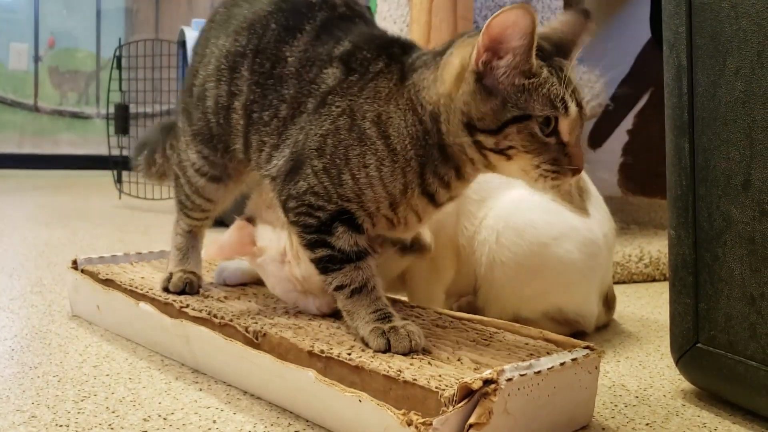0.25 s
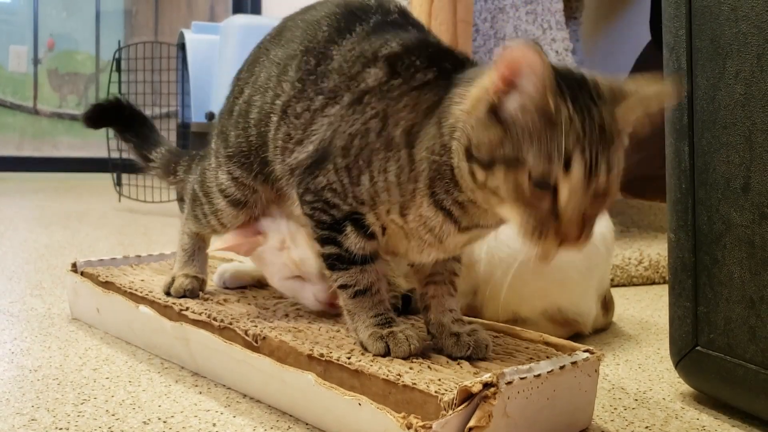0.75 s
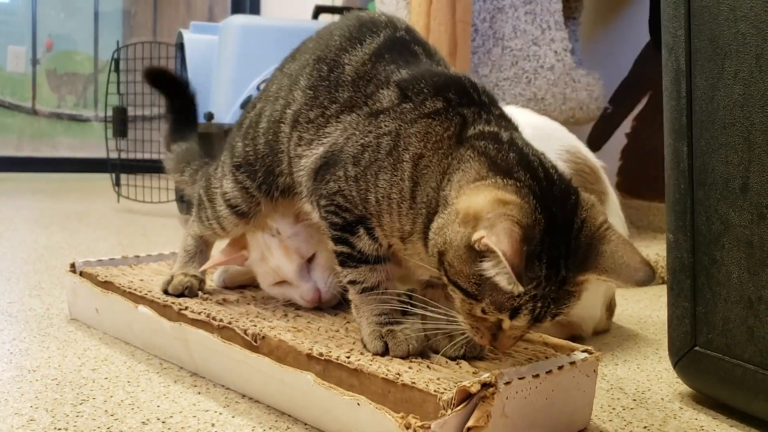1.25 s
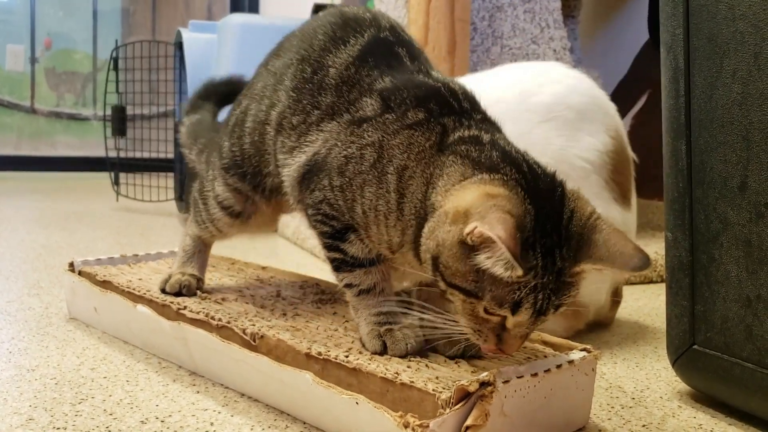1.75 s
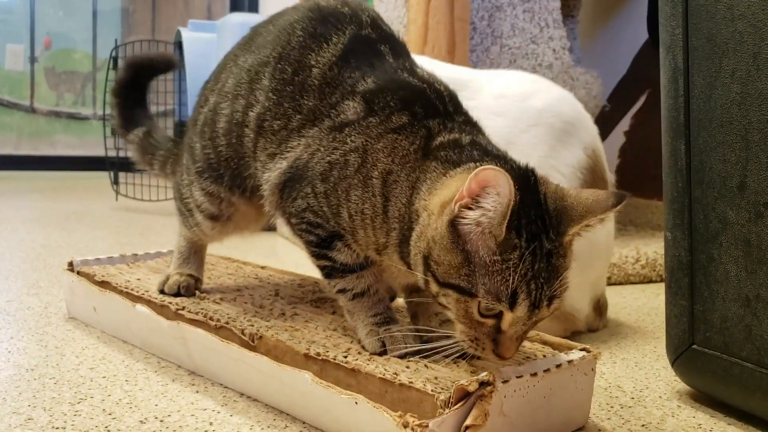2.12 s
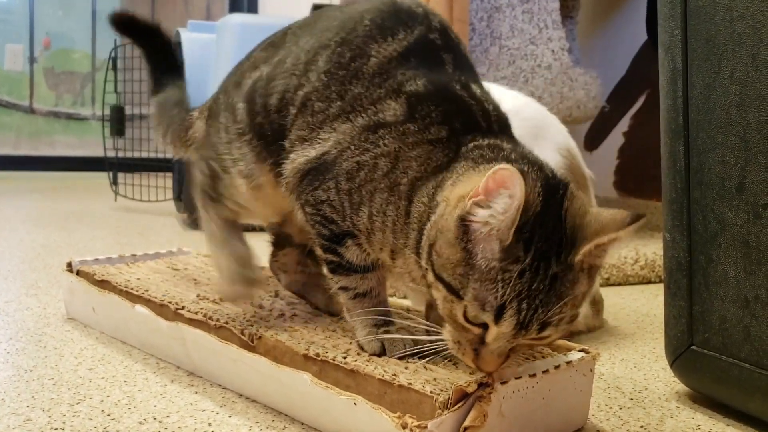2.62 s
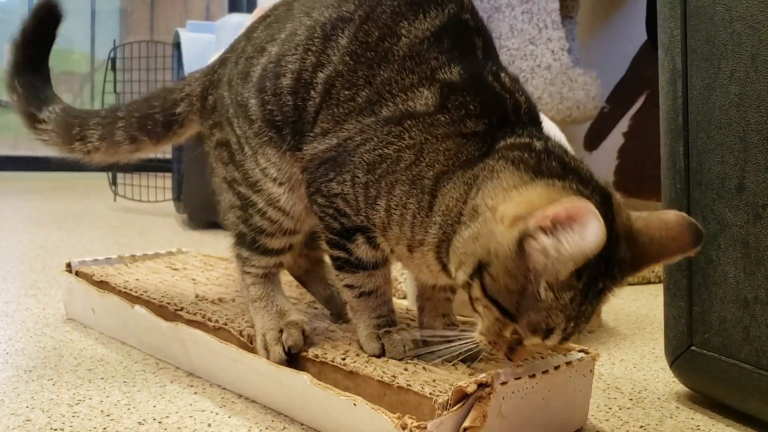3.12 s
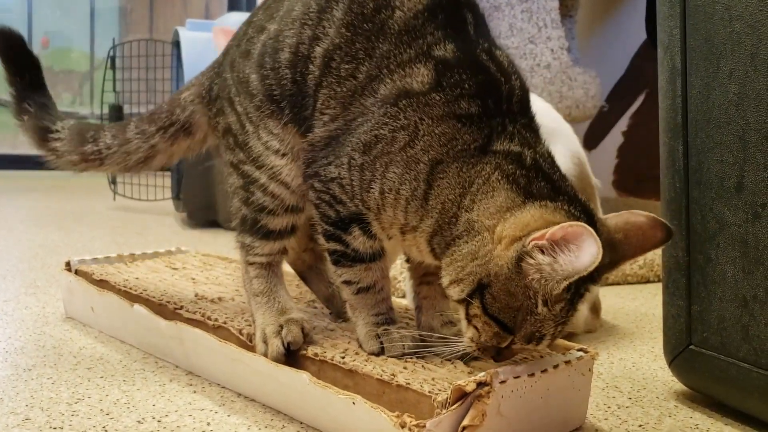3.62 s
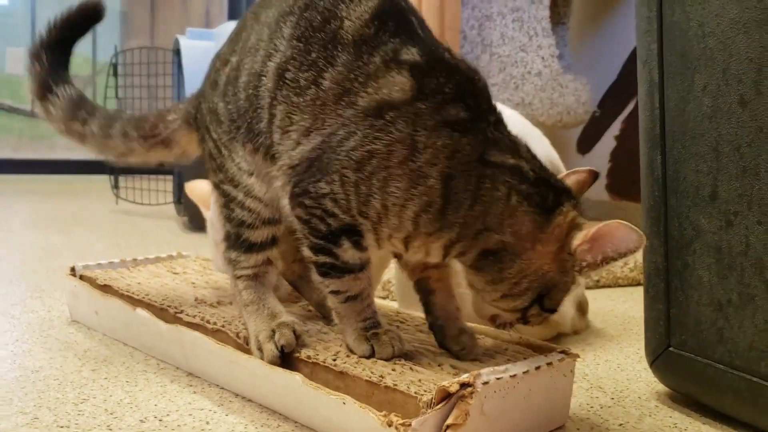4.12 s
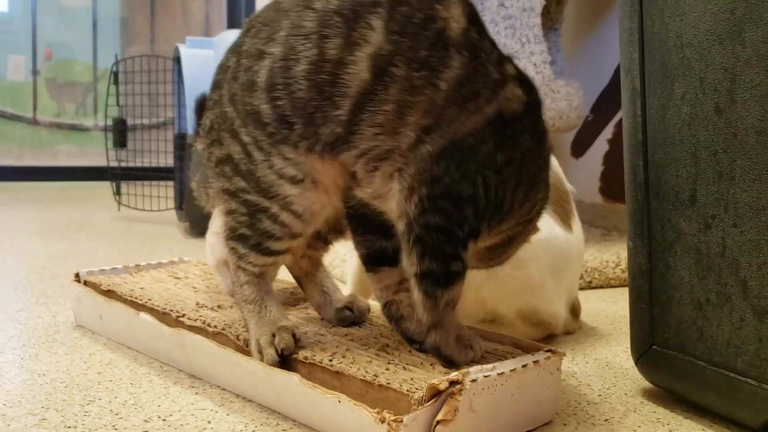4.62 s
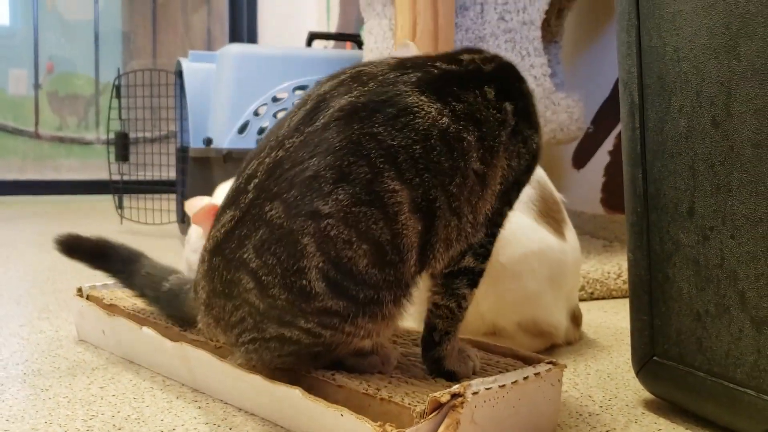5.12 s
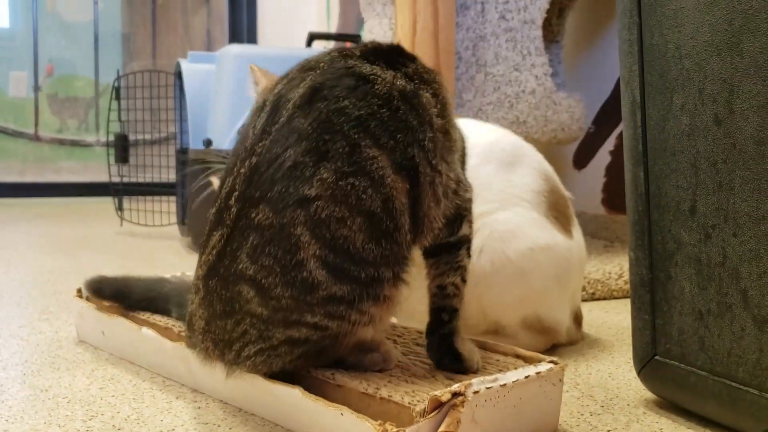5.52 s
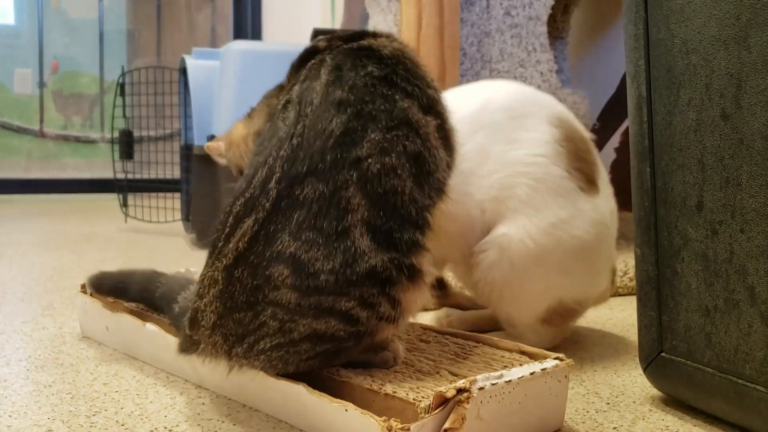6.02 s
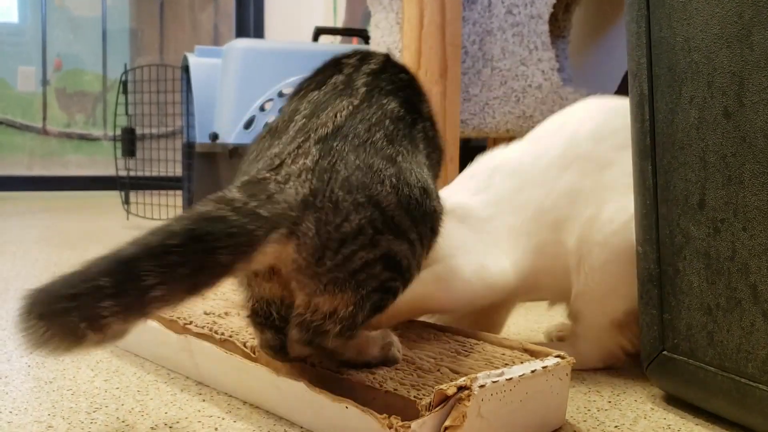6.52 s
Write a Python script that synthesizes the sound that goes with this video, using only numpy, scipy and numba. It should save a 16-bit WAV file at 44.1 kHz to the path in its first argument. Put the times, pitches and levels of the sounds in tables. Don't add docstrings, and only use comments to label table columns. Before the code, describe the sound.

Close stereo phone pickup in a quiet hard-floored room. A cat on a corrugated cardboard scratcher makes small pad rasps, papery rustles and tiny claw ticks. Around four seconds it turns, fur brushing toward the left, ending in a sharp cluster of claw snaps and hollow knocks. A quieter lull follows, then another scrabble as it steps off. Low ventilation rumble, faint hiss and a distant once-a-second clock continue underneath.

```python
import sys
import numpy as np
from scipy import signal
from scipy.fft import rfft, irfft
from scipy.io import wavfile
from scipy.ndimage import uniform_filter1d
from numba import njit

SR = 44100
rng = np.random.default_rng(int(sys.argv[2]) if len(sys.argv) > 2 else 0)


def transcribe(signal):
    frames = np.atleast_2d(signal).T
    limited = np.clip(frames, -1, 1)
    pcm = np.round(limited * 32767).astype(np.int16)
    wavfile.write(sys.argv[1], SR, pcm)


def boost(x):
    u = np.asarray(x, float) / 20
    return 10 ** u


N = 298116
TIME_S = np.arange(N) / SR
BIN_HZ = np.fft.rfftfreq(N, 1 / SR)

# [f/Hz, width/Hz, level/dB]
BOX_MODES = [(413, 150, 14), (467.7, 75, 7), (620, 148, -5), (1050, 274, 1.5)]


def gains(points):
    hz, db = np.transpose(points)
    return boost(np.interp(np.log(BIN_HZ + 1), np.log(hz), db))


def colour(x, points):
    y = irfft(rfft(x) * gains(points), N)
    return y / np.sqrt(np.mean(y ** 2))


@njit
def svf(x, hz, q):
    y, b, l = np.empty(len(x)), 0., 0.
    for i in range(len(x)):
        g = np.tan(np.pi * hz[i] / SR)
        v = (b + g * (x[i] - l)) / (1 + g * (g + 1 / q))
        b, l, y[i] = 2 * v - b, l + 2 * g * v, v / q
    return y


def ring(x, hz, width):
    return signal.lfilter(*signal.iirpeak(hz, hz / width, SR), x)


def double_ring(x, hz, first_width, second_width):
    return ring(ring(x, hz, first_width), hz, second_width)


def walk(rate_hz):
    k = int(SR / rate_hz)
    held = np.repeat(rng.standard_normal(N // k + 1), k)
    smooth = uniform_filter1d(uniform_filter1d(held, k), k)[:N]
    return smooth / smooth.std()


def slips(per_s, spread_db, patchy_db):
    when, size = rng.random((2, N))
    force = (when < per_s / SR) * boost(-spread_db * np.log(size) + patchy_db * walk(60))
    x = force * np.sign(rng.standard_normal((2, N)))
    return x / np.sqrt(np.mean(x ** 2))


def effort_db(touches, rest_db):
    ms = np.arange(0, 1000 * N / SR + 1)
    columns = list(zip(*touches))[:4]
    s, rise_ms, fall_ms, db = (np.array(c)[:, None] for c in columns)
    late_ms = ms - 1000 * s
    touch_db = db - 20 * np.maximum(-late_ms / rise_ms, late_ms / fall_ms)
    power = boost(2 * rest_db) + boost(2 * touch_db).sum(axis=0)
    return np.interp(1000 * TIME_S, ms, 10 * np.log10(power))


def rub(x, touches, rest_db):
    limit_db = -52
    return boost(np.minimum(effort_db(touches, rest_db), limit_db)) * x


def ventilation():
    # [f/Hz, level/dB per Hz]
    rumble_spectrum = [(12, -38), (26, -28.5), (40, -1.5), (81, 7), (123, -4.5), (161, -4), (192, -18.5),
                       (204, -13.5), (226, -16), (270, -19.5), (287, -21), (364, -26.5), (398, -23.5),
                       (483, -100), (700, -93), (910, -118), (1540, -120)]
    # [t/s, level/dB]
    rumble_level = [(0, -46.5), (1.5, -48), (3.196, -48), (3.8, -47), (6.76, -46)]
    # [f/Hz, side minus mid/dB]
    rumble_side = [(30, -19), (100, -27), (160, -11), (280, -22.5), (600, 16.5)]
    # [f/Hz, width/Hz, level/dB rms]
    duct_modes = [(57.5, 2.7, -58), (82.6, 7.1, -65), (166.44, 4.9, -64)]
    # [f/Hz, level/dB rms]
    motor_tones = [(221, -59.5), (240, -74), (259, -64.5)]
    mid, other = colour(rng.standard_normal((2, N)), rumble_spectrum + [(1100, -72.5)])
    mid = np.roll(mid, -np.argmin(mid[:SR // 4]))
    side = irfft(rfft(other) * gains(rumble_side), N)
    air_gain = boost(np.interp(TIME_S, *np.transpose(rumble_level)))
    out = air_gain * (mid + side * np.array([[1], [-1]]))
    for hz, width_hz, db in duct_modes:
        boom = double_ring(rng.standard_normal(N), hz, 2 * width_hz, width_hz)
        out = out + boost(db) * boom / boom.std()
    wander_hz = 1.7
    for hz, db in motor_tones:
        swell = np.sqrt(2) * boost(db + 2.2 * walk(4.6))
        turns = np.cumsum(hz + wander_hz * walk(15)) / SR
        out = out + swell * np.sin(2 * np.pi * turns)
    return out


def hiss():
    # [f/Hz, level/dB per Hz]
    hiss_spectrum = [(450, -25), (700, 1), (1000, -1), (1600, -5), (2150, 3.5), (2600, -2), (3100, -2),
                     (4000, -3.5), (5200, -10), (6300, -7.5), (7700, -3), (8200, -13), (10000, -9),
                     (13000, -4), (15700, -5)]
    return boost(-83 + .6 * walk(4)) * colour(rng.standard_normal((2, N)), hiss_spectrum)


def floor():
    # [peak t/s, rise/ms, fall/ms, level/dB]
    sways = [
        (2.6, 440, 690, -51),
        (4.2, 710, 540, -64),
        (5.7, 480, 500, -51),
        (6.2, 370, 440, -52),
        (6.6, 400, 1100, -51),
    ]
    sway = double_ring(rng.standard_normal(N), 48, 40, 35)
    return boost(effort_db(sways, -82)) * sway / sway.std()


def clock():
    # [t/s, length/s, whirr level/dB, case level/dB]
    clock_steps = [
        (0.406, 0.1, -72, -73.5),
        (1.4, 0.12, -77, -72.5),
        (2.4, 0.12, -75.5, -78),
        (3.402, 0.13, -76.5, -74),
        (4.387, 0.15, -87, -72),
        (5.372, 0.19, -77, -72.5),
        (6.405, 0.063, -70, -69),
    ]
    gear = slips(3000, 1.8, 1.8)
    whirr = double_ring(gear, 5100, 800, 550) + boost(-6) * double_ring(gear, 6500, 900, 900)
    case = ring(ring(gear, 1940, 780), 1720, 350)
    out = 0
    for s, length_s, whirr_db, case_db in clock_steps:
        u = (TIME_S - s) / length_s
        swell = np.clip(u / 0.16, 0, 1) * np.clip((1.3 - u) / 0.93, 0, 1)
        out = out + swell * (boost(whirr_db) * whirr / whirr.std() + boost(case_db) * case / case.std())
    return out


def pads():
    # [peak t/s, rise/ms, fall/ms,
    # level/dB, flute f/Hz]
    pad_touches = [(.45, 100, 160, -64.5, 1420), (.92, 97, 250, -68, 1050), (1.04, 160, 75, -70.5, 1270),
                   (1.44, 100, 130, -73, 1750), (1.55, 40, 110, -69.5, 1820), (1.585, 93, 230, -68, 1240),
                   (2.16, 94, 120, -65.5, 1250), (2.44, 200, 160, -78, 1930), (2.585, 21, 115, -63.5, 1630),
                   (2.87, 120, 63, -69, 1050), (3.06, 380, 160, -86.5, 2110), (3.45, 160, 110, -72, 1520),
                   (3.74, 73, 88, -74.5, 1400), (5.44, 125, 180, -67, 1400), (5.735, 70, 99, -69, 1600),
                   (5.99, 73, 90, -63, 1700), (6.07, 120, 130, -68, 1050),
                   (4.07, 100, 200, -72, 2180), (4.12, 45, 250, -65.5, 1330), (4.2, 72, 100, -58.5, 1140),
                  (4.26, 60, 60, -75, 1030), (4.44, 100, 220, -69, 1800), (4.589, 190, 150, -67.5, 2100),
                  (4.715, 13, 200, -59, 1770), (4.76, 59, 41, -60, 1780), (4.808, 8, 44.6, -56, 1890),
                  (4.836, 14.2, 115, -50.5, 3120), (4.9, 100, 62, -56.5, 2870), (6.295, 14, 210, -65, 1040),
                  (6.445, 35, 61, -55, 1420), (6.5, 110, 69, -54, 1670), (6.615, 40, 84, -66, 1640),
                  (6.632, 180, 46, -58, 1740), (6.665, 60, 40, -71, 1620), (6.69, 16, 32, -50, 1260),
                  (6.75, 150, 200, -55.5, 1320)]
    touches = sorted(pad_touches)
    flute_hz = np.interp(TIME_S, [p[0] for p in touches], [p[-1] for p in touches])
    scrape_hz = 0.7 * flute_hz
    grit = slips(2500, 1.1, 1.7)
    flute = np.array([svf(svf(x, flute_hz, 1.8), flute_hz, 2.8) for x in grit])
    scrape = np.array([svf(svf(x, scrape_hz, 0.69), scrape_hz, 0.69) for x in grit])
    rasp = flute + 0.9 * scrape
    return rub(rasp / rasp.std(), touches, -86)


def fibres():
    # [f/Hz, level/dB per Hz]
    fibre_spectrum = [(2820, -74), (4800, -18), (7360, 3.5), (8590, -6.5), (10200, -0.5), (13100, 0),
                      (15000, 1.5), (15800, -4)]
    # [peak t/s, rise/ms, fall/ms, level/dB]
    rustles = [(.45, 240, 170, -64.5), (.95, 50, 330, -68.5), (1.04, 190, 58, -63.5), (1.44, 230, 150, -71),
               (1.57, 93, 960, -70), (1.72, 460, 970, -75), (2.16, 230, 160, -66), (2.44, 78, 460, -74),
               (2.584, 25, 66, -53.5), (2.78, 120, 200, -71), (2.87, 230, 83, -68.5), (3.45, 110, 70, -71),
               (5.03, 100, 250, -76), (5.37, 400, 460, -69), (5.74, 140, 140, -70), (5.99, 130, 210, -63)]
    # [peak t/s, rise/ms, fall/ms, level/dB]
    sweeps = [(3.88, 97, 500, -66), (3.99, 170, 830, -58.5), (4.17, 310, 370, -67), (4.43, 240, 540, -61.5),
              (4.6, 330, 130, -62.5), (4.71, 32, 210, -56.5), (4.79, 100, 100, -68), (4.83, 84, 23, -51),
              (4.9, 170, 130, -57), (6.3, 84, 270, -63), (6.45, 130, 93, -58), (6.5, 110, 140, -56),
              (6.64, 160, 59, -63), (6.683, 11, 20, -54), (6.76, 270, 100, -57.5)]
    fibre = colour(slips(12000, 0.4, 1.37), fibre_spectrum)
    finest = irfft(rfft(fibre) * (BIN_HZ > 11500), N)
    quieter_rustles = [(s, rise, fall, db - 4.5) for s, rise, fall, db in rustles]
    coarse = rub(fibre - finest, rustles + sweeps, -85)
    return coarse + rub(finest, quieter_rustles + list(sweeps), -81)


def leaning():
    # [peak t/s, rise/ms, fall/ms, level/dB]
    leans = [(.46, 120, 225, -63.5), (.94, 144, 140, -66), (1.46, 240, 720, -69.5), (2.54, 510, 130, -75),
             (3.5, 260, 180, -71), (4.1, 25, 170, -63.5), (4.19, 460, 61, -74), (4.45, 34, 580, -73.5),
             (4.76, 72, 100, -75), (4.787, 31, 170, -48), (4.83, 66, 80, -54), (5.44, 1800, 710, -76.5),
             (5.83, 260, 480, -70.5), (5.98, 35, 110, -57.5), (6.07, 100, 270, -78), (6.31, 63, 160, -61.5),
             (6.46, 52, 210, -55), (6.5, 140, 55, -57), (6.62, 220, 330, -58), (6.71, 66, 900, -54)]
    creak = slips(900, 1.7, 1.6)
    creak = creak + 0.32 * creak[::-1]
    hollow = sum(boost(db) * double_ring(creak, hz, 2 * w, w) for hz, w, db in BOX_MODES)
    return rub(hollow / hollow.std(), leans, -81)


def fur():
    # [f/Hz, level/dB per Hz]
    fur_spectrum = [(1300, -30), (2050, -7), (2700, -5), (3150, 4), (4700, 1.5), (6000, 1), (7000, -1.5),
                    (9000, -46)]
    # [peak t/s, rise/ms, fall/ms, level/dB]
    drags = [(.54, 200, 430, -84.5), (.92, 89, 100, -76.5), (1.03, 570, 630, -78.5),
             (1.57, 290, 1400, -81.5), (2.16, 100, 120, -73.5), (2.59, 28, 85, -66), (2.85, 970, 280, -82),
             (3.45, 200, 290, -84), (3.99, 73, 550, -60.5), (4.12, 440, 370, -63), (4.45, 130, 660, -67),
             (4.6, 500, 350, -64.5), (4.72, 33, 290, -60.5), (4.818, 22, 27, -56), (4.84, 30, 200, -63),
             (4.91, 52, 62, -71), (5.37, 460, 540, -77.5), (5.74, 150, 180, -81), (5.98, 260, 330, -76.5),
             (6.31, 100, 610, -73), (6.5, 165, 140, -61), (6.72, 120, 900, -66.5)]
    # [t/s, left minus right/dB]
    turn_left = [
        (3.7, 0),
        (3.95, 15),
        (4.2, 12),
        (4.6, 8),
        (4.75, 1),
    ]
    brush = colour(slips(9000, 0.47, 0.78), fur_spectrum)
    left = boost(np.interp(TIME_S, *np.transpose(turn_left)) / 2)
    brush = brush * np.array([left, 1 / left]) * 2 / (left + 1 / left)
    return rub(brush, drags, -91)


def claws():
    # [t/s, peak level/dB, ring f/Hz, tick level/dB]
    catches = [(0.8874, -64, 950, -61), (0.946, -59, 890, -47.5), (1.5366, -64, 920, -71),
               (1.636, -68, 1030, -54), (1.669, -58, 4100, -55), (2.137, -64, 958, -51),
               (2.152, -53, 1260, -46.5), (2.157, -58, 1300, -58), (2.2, -59, 1430, -70),
               (2.228, -71, 1100, -60), (1.993, -86, 1200, -55), (2.1945, -54, 1400, -68),
               (2.2335, -72, 1060, -55), (2.574, -61, 1110, -52), (2.5835, -65, 950, -62),
               (2.6624, -64, 1540, -59), (2.8544, -61, 1050, -70), (3.194, -84, 956, -62),
               (3.4705, -62, 1070, -56.5), (3.637, -89, 910, -66), (4.098, -59, 870, -64),
               (4.1384, -57, 1610, -60), (4.5694, -57, 2320, -61), (1.55, -61, 1680, -78),
               (4.15, -51, 1580, -70), (4.207, -59, 1050, -70), (4.217, -58, 1000, -70),
               (5.938, -54, 530, -72), (4.195, -50, 960, -70), (5.838, -57, 450, -75),
               (6.287, -69, 872, -66), (6.307, -65, 1090, -71)]
    # [t/s, peak level/dB, ring f/Hz, tick level/dB, tear length/ms]
    snaps = [(4.193, -41, 1930, -44, 0.38), (4.7177, -46, 1650, -43, 1.9), (4.7073, -57, 1600, -46, 1.3),
             (4.7103, -57, 1700, -52, 1.1), (4.743, -48, 1750, -58, 2.1), (4.7524, -39, 1940, -43, 1.6),
             (4.7833, -31.5, 1770, -25, 1.36), (4.8035, -32.5, 1760, -29.5, 0.8),
             (4.8152, -24.5, 3000, -41, 0.63), (4.816, -35, 3740, -36, 0.7), (4.805, -35, 1170, -28, 1.3),
             (4.8095, -37.5, 1820, -34, 2), (4.816, -35, 1870, -29, 1.4), (4.785, -36.5, 1110, -44, 1.6),
             (4.829, -45.5, 2900, -51, 1.3), (4.832, -36, 1900, -49, 0.89), (4.8506, -44, 2800, -59, 1.04),
             (4.909, -51, 2400, -44.5, 5.1), (6.407, -59, 1960, -65, 1.1), (6.423, -50, 1690, -65, 1.2),
             (6.437, -50, 1080, -57, 0.84), (6.442, -48.5, 1900, -62, 1.7), (6.495, -50, 1690, -38, 3.2),
             (6.502, -46, 3300, -39, 1.3), (6.611, -47, 1830, -63, 0.9), (6.629, -33.5, 1840, -54, 1.6),
             (6.636, -43.5, 1800, -50, 1.5), (6.68, -60, 1500, -44, 1.5), (6.6835, -35, 1400, -35, 0.34),
             (6.7034, -55, 977, -63, 1.1), (6.7197, -42, 860, -59, 1.4), (6.7565, -55, 1535, -40.5, 2.5)]
    # [f/Hz, width/Hz, level/dB]
    tick_modes = [(4250, 1040, 0.5), (7530, 1700, 4), (10830, 3300, -1.5), (14200, 4000, 0)]
    port_lag = 3
    out, t = np.zeros((2, N + 4096)), np.arange(4096) / SR
    rows = [tuple(row) + (1.24, 6000) for row in catches] + [tuple(row) + (3000,) for row in snaps]
    for s, ring_db, hz, tick_db, tear_ms, edge_hz in rows:
        burst = np.sqrt(t) * np.exp(-t / np.clip(tear_ms / 1000, .0002, .005))
        shared, left, right = rng.standard_normal((3, 4096)) * burst
        tear = np.array([1.54 * shared + 1.3 * left, np.roll(0.38 * shared + 1.16 * right, port_lag)])
        high_pass = signal.butter(2, edge_hz, "highpass", fs=SR, output="sos")
        bright = signal.sosfilt(high_pass, tear)
        tear[[0, 1], [24, 24]] += 1.1 * np.sqrt(np.sum(tear ** 2, axis=1))
        flute = double_ring(tear, hz, .55 * hz, .2 * hz)
        flute = flute + 0.3 * double_ring(tear, 0.61 * hz, 0.36 * hz, 0.36 * hz)
        tick = sum(boost(db) * ring(bright, f, w) for f, w, db in tick_modes)
        at = int(s * SR)
        out[:, at:at + 4096] += boost(ring_db) * flute / np.abs(flute).max()
        out[:, at:at + 4096] += boost(tick_db) * tick / np.abs(tick).max()
    return out[:, :N]


def paws():
    # [t/s, peak level/dB]
    knocks = [(0.8886, -69), (1.536, -64), (2.662, -74), (3.472, -70), (4.718, -59), (4.7547, -49),
              (4.8087, -38.5), (4.815, -39.5), (4.8264, -66), (4.8337, -46), (4.8494, -52.5), (5.842, -74),
              (5.94, -60), (6.439, -69), (6.495, -50), (6.6281, -54), (6.6843, -38), (6.702, -48),
              (6.719, -50)]
    out, t = np.zeros(N + 4096), np.arange(4096) / SR
    soft_start = 1 - np.exp(-t / 0.0035)
    knock = 0
    for hz, width_hz, db in BOX_MODES:
        decay = np.exp(-np.pi * .9 * width_hz * t)
        knock = knock + boost(db) * np.sin(2 * np.pi * hz * t) * decay * soft_start
    for s, db in knocks:
        at = int(s * SR)
        out[at:at + 4096] += boost(db) * knock / np.abs(knock).max()
    return out[:N]


def room(x):
    t60_s, tail_db, scatter_s = 0.22, -15, 0.008
    t = np.arange(SR // 2) / SR
    swell = np.exp(-np.log(1000) * t / t60_s) * (1 - np.exp(-t / scatter_s))
    tail = rng.standard_normal((2, len(t))) * swell
    tail = tail * boost(tail_db) / np.sqrt(np.sum(tail ** 2, axis=1, keepdims=True))
    return x + signal.fftconvolve(x, tail, axes=1)[:, :N]


def scene():
    rubbing = pads() + fibres() + leaning() + fur()
    return room(clock() + rubbing + claws() + paws()) + ventilation() + hiss() + floor()


def low_pass(x):
    return signal.sosfilt(signal.butter(12, 16530, fs=SR, output="sos"), x)


def record(dry):
    # [f/Hz, left minus right/dB]
    left_port = [(200, 1), (500, -1), (1150, 4.5), (1650, 2), (2150, 4), (4800, 1.5), (7100, 10.5),
                 (8400, 4), (10000, 1), (15000, 1)]
    tilt = gains(left_port) ** .5
    below_top = BIN_HZ < 15820
    mix = irfft(rfft(dry) * np.array([tilt, 1 / tilt]) * below_top, N)
    return low_pass(mix)


dry = scene()
out = record(dry)
transcribe(out)
```